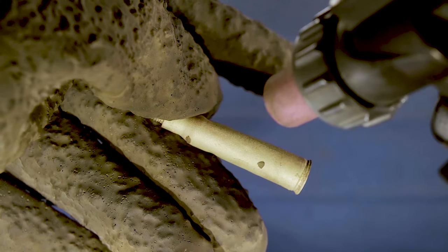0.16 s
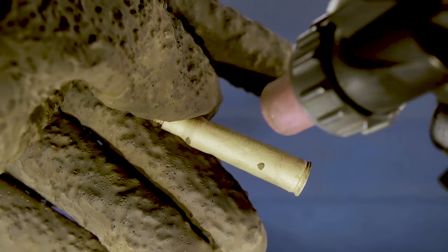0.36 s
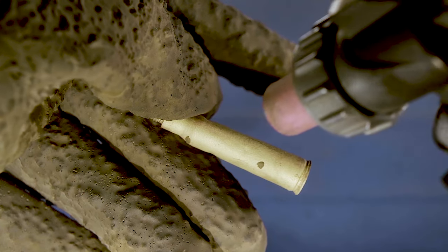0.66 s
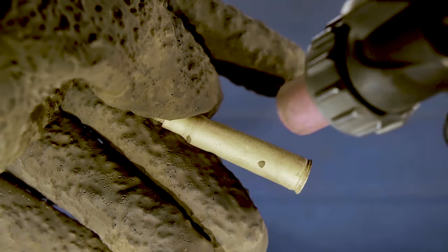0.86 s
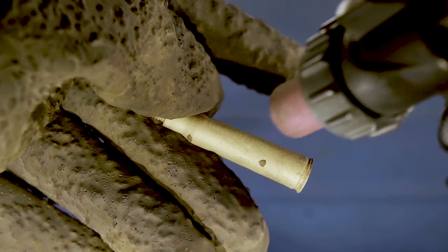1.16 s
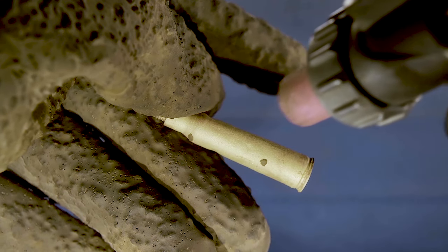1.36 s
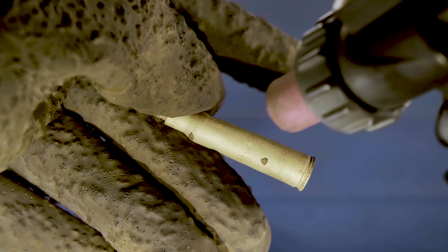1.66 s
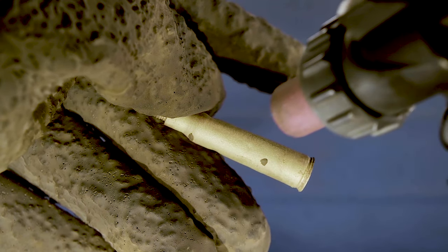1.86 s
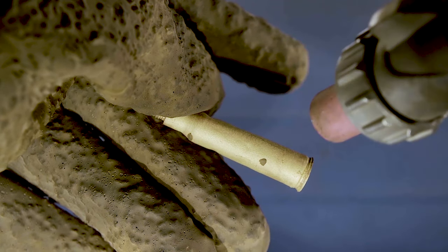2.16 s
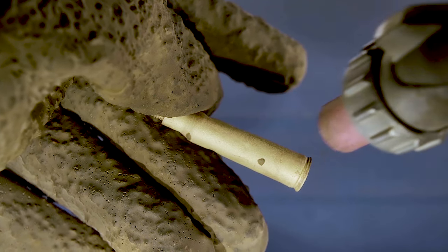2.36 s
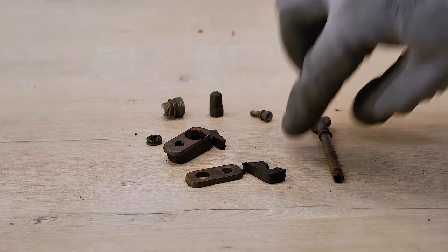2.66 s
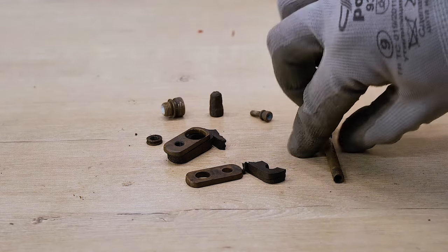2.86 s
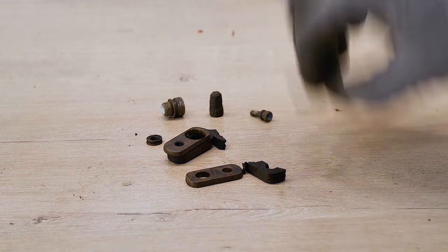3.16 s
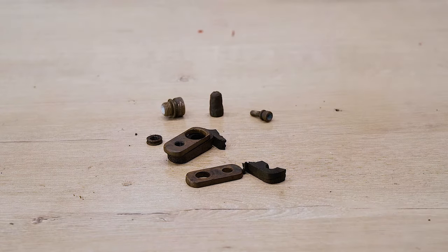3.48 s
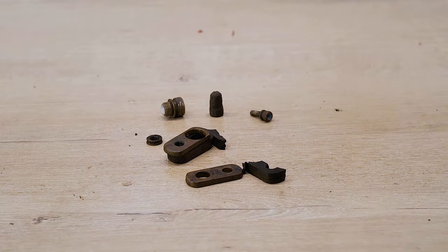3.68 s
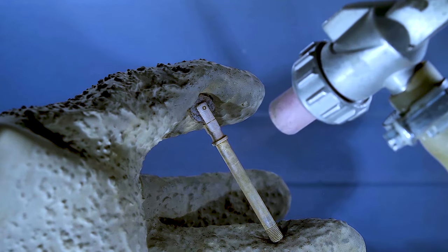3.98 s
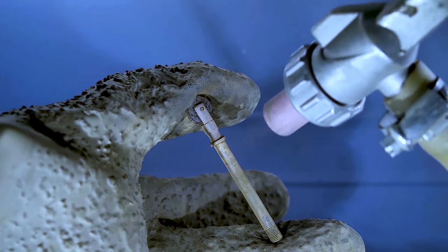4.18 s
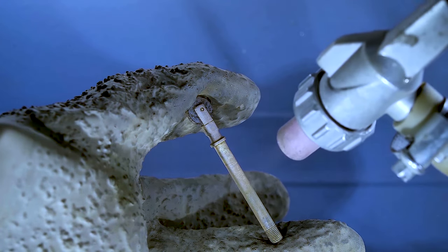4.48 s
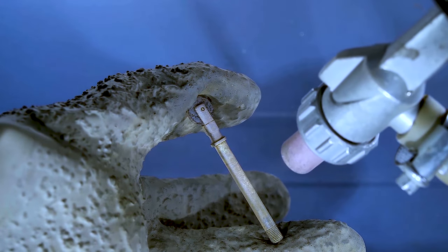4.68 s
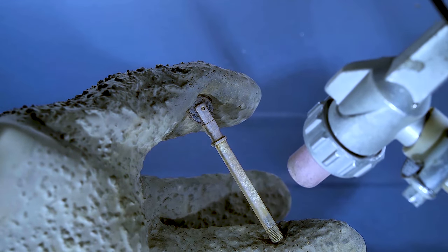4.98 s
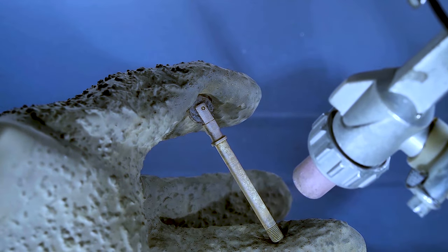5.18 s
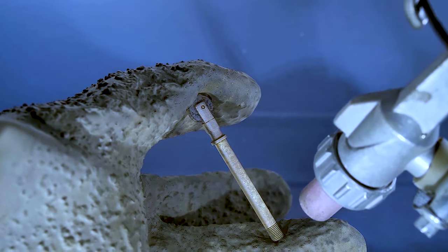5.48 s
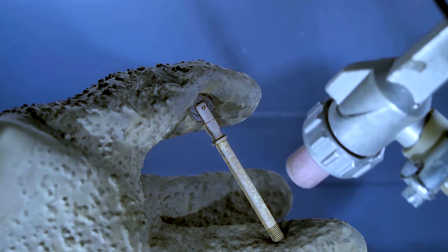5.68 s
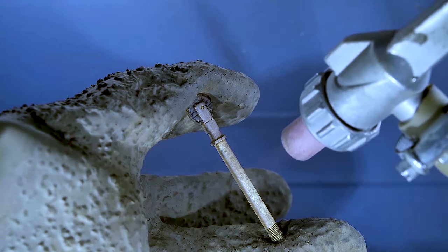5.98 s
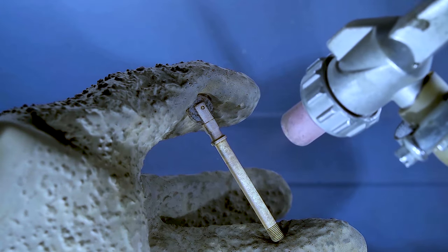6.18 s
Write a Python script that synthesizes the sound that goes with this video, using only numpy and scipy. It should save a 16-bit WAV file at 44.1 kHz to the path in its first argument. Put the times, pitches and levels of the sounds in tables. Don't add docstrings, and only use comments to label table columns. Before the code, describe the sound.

The very tail of an earlier blast stops at once, leaving dull leaking air and low compressor hum with a faint motor tone. At about 0.26 s the gun opens almost instantly into a dense, harsh hiss and roar of grit, coloured by ringing cabinet resonances, steady with slight sputter and a slowly shifting hollow tint. At 2.55 s it cuts to a quiet room with faint rumble: a tiny bright glove creak near 2.63 s, then around 2.98-3.05 s a rapid woody knock with rebounding metallic ticks, a low thud and short reverberation. Faint dull creaks follow near 3.3 s, then a rubber-on-wood rub swelling from 3.6 to 3.75 s. At 3.80 s blasting returns abruptly, closer, brighter and wider, with low turbulent rumble that slowly weakens, a brief faint high metallic singing and buried beating fan hum, continuing unbroken to the end at about 6.3 s.

```python
import sys
import numpy as np
from scipy import signal
from scipy.fft import rfft, irfft, next_fast_len
from scipy.io import wavfile
from scipy.ndimage import uniform_filter1d

SR = 44100
rng = np.random.default_rng(int(sys.argv[2]) if len(sys.argv) > 2 else 0)


def attenuation_scalar(level_db):
    decades = np.asarray(level_db, float) / 20
    return 10 ** decades


def persist_wave(psi):
    counts = np.round(np.clip(psi, -1, 1) * 32767).astype(np.int16)
    wavfile.write(sys.argv[1], SR, np.atleast_2d(counts).T)


N = 279594
T = np.arange(N) / SR

CUTS = [.0135, 2.553, 3.8035]


def rms_one(x):
    return x / np.sqrt(np.mean(x ** 2) + 1e-20)


def in_time(rows):
    s, *columns = np.transpose(rows)
    return [np.interp(T, s, c) for c in columns]


def at_hz(points, hz):
    f, db = np.transpose(points)
    return np.interp(np.log(hz + 1), np.log(f), db)


def between(t0, t1, fade_s=.001):
    return np.clip(np.minimum(T - t0, t1 - T) / fade_s + .5, 0, 1)


def swell(s, db, rise_db_per_s, hold_s, fall_db_per_s):
    rise_db = rise_db_per_s * np.clip(s - T, 0, 1)
    fall_db = fall_db_per_s * np.clip(T - s - hold_s, 0, 9)
    return attenuation_scalar(db - rise_db - fall_db)


def drift(rate, part=slice(None)):
    r = np.exp(-80 * np.pi * rate / SR)
    white = rng.standard_normal(N // 40 + 2002)
    slow = signal.lfilter([1], [1, -2 * r, r * r], white)[2000:]
    return np.interp(T[part] * SR / 40, np.arange(len(slow)), rms_one(slow))


def shaped(x, db_of_hz):
    size = next_fast_len(N)
    hz = np.arange(size // 2 + 1) * SR / size
    return irfft(rfft(x, size) * attenuation_scalar(db_of_hz(hz)), size)[..., :N]


def below(x, cut_hz):
    return shaped(x, lambda hz: -20 * np.log10(1 + np.exp(np.clip((hz - cut_hz) / 12, -50, 50))))


def noise(spectrum, alike):
    mid, side = shaped(rng.standard_normal((2, N)), lambda hz: at_hz(spectrum, hz))
    alike = np.clip(alike, -1, 1)
    return rms_one(np.sqrt(1 + alike) * mid + np.sqrt(1 - alike) * side * [[1], [-1]])


def ring(clicks, hz, t60):
    r, w = attenuation_scalar(-60 / (t60 * SR)), 2 * np.pi * hz / SR
    return signal.lfilter([0, np.sin(w)], [1, -2 * r * np.cos(w), r * r], clicks + 1e-18)


def room_tone():
    # (frequency [Hz], density [dB per Hz])
    room_colour = [(60, 16.5), (150, 4), (300, 5), (900, 0.5), (2000, -3), (5000, -5), (10600, -7),
                   (13600, -29)]
    room = attenuation_scalar(-83.5) * noise([(30, -33)] + room_colour, alike=0.2)
    sway_colour = [(8, 2.5), (25, -15.5), (40, -23.5), (100, -34), (200, -94)]
    return room + attenuation_scalar(-67.5) * noise(sway_colour, alike=0.65)


def idle_air():
    # (frequency [Hz], density [dB per Hz])
    idle_colour = [(30, -17), (100, -26.5), (160, -5), (220, -15), (380, -5), (740, -8), (950, -16.5),
                   (2050, -19.5), (2850, -27.5), (3800, -41), (5140, -24.5), (5700, -50), (10600, -56),
                   (13600, -58)]
    return attenuation_scalar(-61 + 1.2 * drift(4.9)) * noise(idle_colour, alike=0.88)


def hum(span, hz, orders, wander_db, lag):
    in_step_s = 5.82
    part = slice(int(span[0] * SR), int(span[1] * SR))
    out = np.zeros((2, N))
    for k, db in orders:
        phase = 2 * np.pi * (k * hz * (T[part] - in_step_s) + rng.random() * (k > 1))
        pair = np.sin([phase, phase - lag * rng.standard_normal()])
        out[:, part] += np.sqrt(2) * attenuation_scalar(db + wander_db * drift(1.1, part)) * pair
    return out


def compressor(span):
    # (multiple of the stroke rate [1], level [dB rms])
    strokes = [(1, -80), (2, -83.5), (3, -96), (4, -78), (5, -79.5), (6, -79), (7, -73.5), (8, -66.5),
               (9, -90), (10, -82.5), (11, -70), (12, -71.5), (13, -75.5), (15, -79.5), (16, -85.5),
               (17, -90), (18, -71.5), (21.5, -74), (22, -81.5), (28, -75.5)]
    # (multiple of its rate [1], level [dB rms])
    far_motor = [(1, -70.5), (3, -74)]
    return hum(span, 39.96, strokes, 1.9, lag=.3) + hum(span, 176.0, far_motor, 3.1, lag=0.27)


def extractor_fans(span):
    # (multiple of its speed [1], level [dB rms])
    first_fan = [(1, -80), (2, -72.5), (3, -73.5), (5, -66), (7, -74.5), (8, -68.5), (9, -73), (10, -95),
                 (11, -78)]
    # (multiple of its speed [1], level [dB rms])
    second_fan = [(1, -76.5), (2, -77.5), (3, -83.5), (5, -66.5), (6, -85), (8, -75), (10, -80)]
    fans = hum(span, 115.02, first_fan, 2.2, lag=0.3) + hum(span, 117.55, second_fan, 1.8, lag=0.79)
    return fans + hum(span, 176.0, [(3, -77)], 1.1, lag=.3)


def thumps():
    # (time [s], level [dB], hold [s], release [dB per s])
    thuds = [
        (2.893, -68, .0, 180),
        (2.93, -75, .06, 200),
        (3.016, -58, .005, 190),
        (3.1, -78, .05, 40),
    ]
    gain = sum(swell(s, db - 6.5, 700, hold_s, fall) for s, db, hold_s, fall in thuds)
    return gain * noise([(25, -32), (45, -8), (80, -9), (130, -43), (300, -86)], alike=.9)


def shudder():
    # (frequency [Hz], density [dB per Hz])
    shudder_colour = [(200, -24), (450, -7), (700, 0), (1400, -4), (2400, -9.5), (2800, -24), (3300, -13),
                      (4200, -19), (4700, -24), (10600, -39), (13600, -42)]
    knock = swell(2.988, -54.5, rise_db_per_s=3000, hold_s=0.034, fall_db_per_s=235)
    return knock * attenuation_scalar(1.6 * drift(60.0)) * noise(shudder_colour, alike=0.96)


def rustles():
    # (time [s], level [dB], frequency [Hz], t60 [s])
    creaks = [
        (2.627, -72, 4800, 0.019),
        (2.768, -86.5, 4200, .02),
        (3.297, -78.5, 850, 0.13),
        (3.34, -81.5, 900, .1),
        (3.37, -84, 3200, .12),
    ]
    out = np.zeros((2, N))
    white = rng.standard_normal(N) + .5 * rng.standard_normal((2, N))
    for s, db, hz, t60 in creaks:
        part = slice(int(s * SR), int(s * SR) + SR // 5)
        band = signal.butter(2, [hz * 0.81, hz * 1.3], "band", fs=SR, output="sos")
        puff = signal.sosfilt(band, white[:, part])
        out[:, part] += rms_one(puff) * attenuation_scalar(db - 60 * T[:SR // 5] / t60)
    return out


def glove():
    # (frequency [Hz], density [dB per Hz])
    rub_colour = [(150, -32), (400, -12), (900, -8.5), (1250, 1), (1700, 2.5), (2200, -5), (2800, -15),
                  (3500, -19), (4200, -21), (4500, -29), (10600, -33), (13600, -39)]
    rub = noise(rub_colour, alike=0.75) * attenuation_scalar(1.1 * drift(40.0))
    dull = below(rub, 2500)
    bright = rub - dull
    drag = swell(3.729, -59.5, 235, N, 0)
    graze = swell(3.645, -81, 1200, 0, -99)
    graze = graze * (T < CUTS[2] + .01)
    pinch = swell(2.99, -69, 330, 0, 240)
    scuff = graze * rms_one(bright) + pinch * rms_one(np.diff(bright, prepend=0))
    return drag * rms_one(dull) + scuff


def taps():
    # (time [s], level [dB], pin share [dB])
    touches = [
        (2.9843, -53, -7),
        (2.9915, -39.5, 5.5),
        (2.995, -40, 2),
        (3.001, -46, 8),
        (3.008, -49, 1),
        (3.022, -48, -2.5),
        (3.034, -52, -3),
        (3.044, -55, -10),
    ]
    # (frequency [Hz], level [dB], t60 [s])
    board_modes = [(382, -17, 0.064), (520, -10, 0.055), (646, -5.5, 0.045), (740, -3, 0.067),
                   (850, -3.5, 0.12), (966, -8, 0.042), (1206, -3.5, 0.045), (1430, 3.5, 0.05),
                   (1805, -5, 0.045), (2400, -3, 0.025)]
    # (frequency [Hz], level [dB], t60 [s])
    pin_modes = [(3280, -5.5, 0.045), (4030, -9, 0.028), (5600, -23, 0.034), (7700, -26, .03)]
    s, db, pin_db = np.transpose(touches)
    at, out = np.round(s * SR).astype(int), np.zeros(N)
    for modes, share_db in ((board_modes, 0 * pin_db), (pin_modes, pin_db)):
        for hz, mode_db, t60 in modes:
            strength = rng.uniform(0.3, 1.35, len(at)) * rng.choice([-1, 1], len(at))
            clicks = np.zeros(N)
            clicks[at] = attenuation_scalar(db + mode_db + share_db - 7.5) * strength
            out += ring(clicks, hz, t60)
    no_bass = signal.butter(4, 350, "high", fs=SR, output="sos")
    out = signal.sosfilt(no_bass, out)
    tail = rng.standard_normal((2, SR // 2)) * attenuation_scalar(-36 - 60 * np.arange(SR // 2) / SR / 0.23)
    return out + signal.fftconvolve(out[None], tail, axes=1)[:, :N]


def pin_song():
    song_hz = [4718, 5272, 6776]
    song = sum(ring(rng.standard_normal(N), hz, 0.042) for hz in song_hz)
    return swell(4.25, -56.5, 0, 0, 30) * rms_one(song)


def trigger():
    valve_s, opening_s = .2555, .012
    earlier = swell(0, 5.0, 0, 0, 119.5) * between(-1, CUTS[0])
    faint_tail = swell(CUTS[0], -32, 0, 0, 69)
    leak = swell(valve_s, -19, 600, N, 0)
    opened = np.clip((T - valve_s) / opening_s, 0, 1)
    return earlier + faint_tail + opened + (1 - opened) * leak


def combed(count, size, echo_db, moves_per_s):
    places = 3
    turn = np.pi * moves_per_s * T[:count] + 0.64 * drift(1.0)[:count]
    out = 0
    for k in range(places):
        grain_size = attenuation_scalar(1.5 * rng.standard_normal((2, count)))
        grit = rng.standard_normal((2, count)) * grain_size
        walls = rng.standard_normal((2, 2000)) * attenuation_scalar(echo_db - 60 * T[:2000] / 0.096)
        walls[:, 0] = 1
        here = np.cos(turn + np.pi * k / places) ** 2
        out = out + rfft(grit * here, size) * rfft(walls, size)
    return out


def jet(span, mid_db, side_db, side_gain_db, peaks, lift_db, dips, lean,
        rumble_db, roar_db, sizzle_db, echo_db, patchy_db, lead):
    part = slice(int(span[0] * SR), int(span[1] * SR))
    count = len(T[part])
    size = next_fast_len(count)
    hz = np.arange(size // 2 + 1) * SR / size
    hollow_db = sum(db / (1 + (2 * (hz - f) / width) ** 2) for f, width, db in dips)
    standing = sum(attenuation_scalar(2 * (db + lift_db)) / (1 + (2 * (hz - f) / width) ** 2) for f, width, db in peaks)
    mid, side = combed(count, size, echo_db, moves_per_s=0.8) * attenuation_scalar(hollow_db)
    lead = lead * np.minimum(hz / 6000, 1)
    side = np.sqrt(1 - lead ** 2) * side + 1j * lead * mid
    mid = mid * attenuation_scalar(at_hz(mid_db, hz)) * np.sqrt(1 + standing)
    side = side * attenuation_scalar(at_hz(side_db, hz) + side_gain_db) * np.sqrt(1 + .3 * standing)
    lean_db = at_hz(lean, hz) / 2
    pair = np.array([(mid + side) * attenuation_scalar(lean_db), (mid - side) * attenuation_scalar(-lean_db)])
    edges = [0, 330, 1500, 2700, 3700, 5100, 7000, 9000, 11500, SR]
    bands = [irfft(pair * ((hz >= a) & (hz < b)), size)[:, :count] for a, b in zip(edges, edges[1:])]
    roar_db = roar_db - np.median(roar_db[part])
    sizzle_db = sizzle_db - np.median(sizzle_db[part])
    tilt = [rumble_db] + [roar_db] * 2 + [0] * 3 + [sizzle_db] * 3
    flow = drift(17.0, part)
    out = np.zeros((2, N))
    for band, band_db in zip(bands, tilt):
        patches_db = patchy_db * (flow + drift(5.8, part))
        out[:, part] += band * attenuation_scalar((band_db + 0 * T)[part] + patches_db)
    return out / np.sqrt(np.mean(sum(bands[3:6]).mean(axis=0) ** 2))


def sleeve_blast(span):
    # (time [s], level [dB])
    aim = [
        (0.3, -43.5),
        (0.57, -43),
        (2.05, -44.5),
        (2.45, -44),
        (2.55, -44.5),
    ]
    # (frequency [Hz], density [dB per Hz])
    mid_colour = [(300, -31.5), (800, -11.5), (2600, -7.5), (3000, -5.5), (5000, -5), (6000, -6),
                  (7800, -6.5), (8500, -6.5), (10600, -5), (10800, -9.5), (13600, -12)]
    # (frequency [Hz], density [dB per Hz])
    side_colour = [(300, -24), (800, -15), (2600, -12), (4200, -7), (5000, -2.5), (6000, -5), (8300, 0),
                   (10600, -0.5), (10800, -5), (13600, -4.5)]
    # (frequency [Hz], width [Hz], level [dB])
    resonances = [ (1300, 35, -3), (1560, 150, -4), (1720, 80, -4), (2270, 50, -3), (2920, 60, -2),
                  (3146, 55, 1), (3270, 45, 2), (3480, 50, 0), (3610, 120, -2), (4000, 60, -3),
                  (4202, 45, 6), (4530, 40, -2), (4640, 50, -1), (4800, 60, 0), (4900, 50, 3),
                  (4995, 50, 4), (5183, 55, 3), (5390, 60, 1), (6200, 60, -4), (6400, 60, -4),
                  (6712, 90, 2), (7190, 200, -3), (7580, 64, -1), (8512, 52, 2), (8897, 56, 1),
                  (9410, 60, -1), (9740, 60, -2), (10205, 70, 0), (11900, 240, -5), (12800, 93, -5)]
    # (frequency [Hz], width [Hz], level [dB])
    cancellations = [(2760, 100, -5), (3350, 60, -7), (4100, 60, -4), (4440, 50, -5), (6030, 130, -7),
                     (6970, 120, -6), (7780, 250, -6), (10880, 250, -4)]
    # (frequency [Hz], left minus right [dB])
    balance = [(60, -6), (110, -5.5), (200, 4), (380, 0), (700, 0), (1290, 0.0), (2380, 0.0), (4400, 0.5),
               (8120, 3), (15000, 2.0)]
    jet_db, = in_time(aim)
    roar_follows, sizzle_follows = .4, 0.96
    blast = jet(span, mid_colour, side_colour, 0.0, resonances, 5.14, cancellations, balance, rumble_db=0,
                roar_db=(roar_follows - 1) * jet_db, sizzle_db=(sizzle_follows - 1) * jet_db,
                echo_db=-30, patchy_db=0.57, lead=.35)
    return attenuation_scalar(jet_db - 2.5) * trigger() * blast


def pin_blast(span):
    # (time [s], level [dB])
    aim = [
        (3.81, -44),
        (4.01, -43),
        (5.75, -44),
        (6.16, -42.5),
        (6.34, -43.5),
    ]
    # (frequency [Hz], density [dB per Hz])
    mid_colour = [(20, -25), (70, -23.5), (110, -15.5), (160, -14.5), (260, -12), (450, -9.5), (640, -7.5),
                  (980, -7.5), (1300, -8.5), (2300, -10), (4500, -9), (7000, -6.5), (9350, -6),
                  (15600, -5.5)]
    # (frequency [Hz], density [dB per Hz])
    side_colour = [(20, -30), (70, -21), (120, -20), (300, -10.5), (590, -9.5), (1500, -9.5), (3500, -10),
                   (7000, -8.5), (13900, -4.5), (15600, -4)]
    # (frequency [Hz], width [Hz],
    # level [dB])
    resonances = [(1630, 100, 0), (4718, 55, 2), (5270, 80, 1), (6050, 50, 0), (6776, 90, 2),
                  (8340, 190, 0), (9400, 300, 0), (10250, 100, -1), (10740, 160, 1), (12600, 270, 0),
                  (14170, 150, -1)]
    # (frequency [Hz], width [Hz], level [dB])
    interference = [(2340, 150, 0), (4400, 200, 1), (9630, 200, -3), (11850, 200, -1)]
    # (frequency [Hz], left minus right [dB])
    balance = [(60, 0.0), (110, 1.0), (200, 0.077), (380, 0.5), (700, 0.32), (1290, 0.5), (2380, 0.4),
               (4400, 0.0), (8120, 0.59), (15000, 0.5)]
    jet_db, = in_time(aim)
    roar_follows, sizzle_follows = 0.96, 1.8
    hopper_db = 0.7 - 1.36 * (T - CUTS[2])
    blast = jet(span, mid_colour, side_colour, -1.5, resonances, 2.1, interference, balance, rumble_db=hopper_db,
                roar_db=(roar_follows - 1) * jet_db, sizzle_db=(sizzle_follows - 1) * jet_db,
                echo_db=-31.5, patchy_db=.5, lead=.1)
    return attenuation_scalar(jet_db - 7) * blast


def bench_scene():
    return room_tone() + thumps() + shudder() + glove() + taps() + rustles()


def sleeve_scene():
    span = 0, CUTS[1] + 0.012
    shop = idle_air() + compressor(span)
    gain_db = np.interp(T, [.26, .34], [2.5, 0])
    return sleeve_blast(span) + shop * attenuation_scalar(gain_db)


def pin_scene():
    span = CUTS[2] - .01, N / SR
    return pin_blast(span) + pin_song() + extractor_fans(span)


def scene():
    sleeve = sleeve_scene() * between(-1, CUTS[1])
    bench = bench_scene() * between(CUTS[1], CUTS[2])
    pin = pin_scene() * between(CUTS[2], N)
    return sleeve + bench + pin


def roll_off(x):
    return signal.sosfilt(signal.butter(12, 16690, fs=SR, output="sos"), x)


def record(dry):
    offset_level = [-.0019, -0.0043]
    early = dry * (T < CUTS[2])
    body = below(early, 10700)
    top = below(early - body, 13650)
    top_db = 10 * np.log10(uniform_filter1d(np.mean(top ** 2, axis=0), size=2048) + 1e-14)
    kept = np.clip((top_db + np.where(T < CUTS[1], 88, 95.5)) / 2, 0, 1)
    settling = signal.lfilter([.002], [1, -.998], between(CUTS[1], CUTS[2]))
    offset = np.outer(offset_level, settling)
    late = below(dry - early, 15720)
    return roll_off(body + top * kept + offset + late)


dry = scene()
out = record(dry)
persist_wave(out)
```